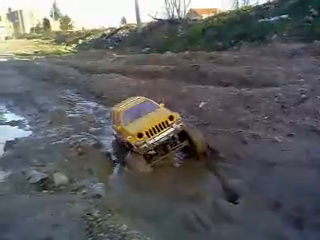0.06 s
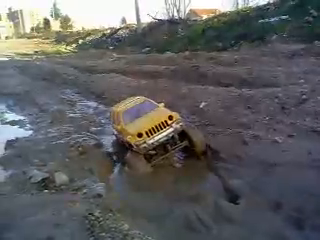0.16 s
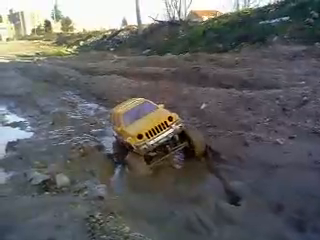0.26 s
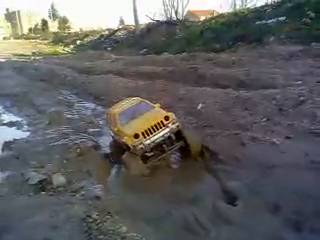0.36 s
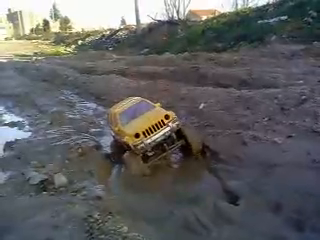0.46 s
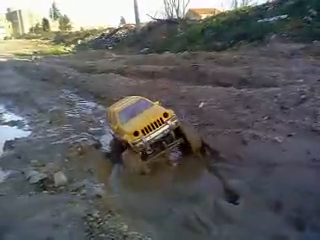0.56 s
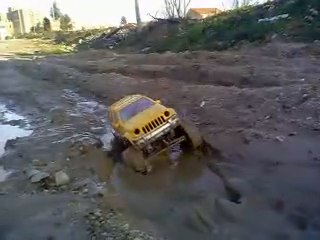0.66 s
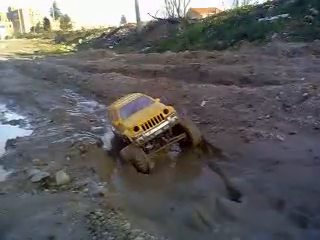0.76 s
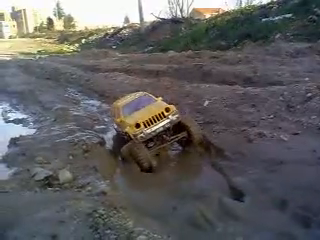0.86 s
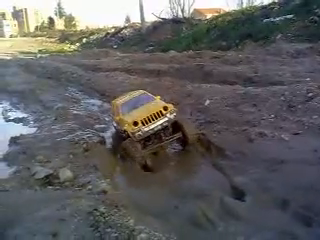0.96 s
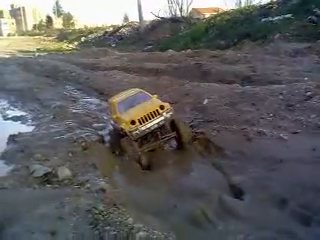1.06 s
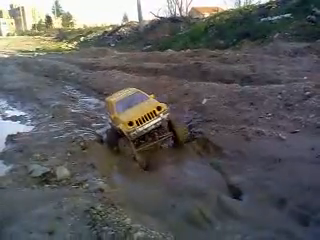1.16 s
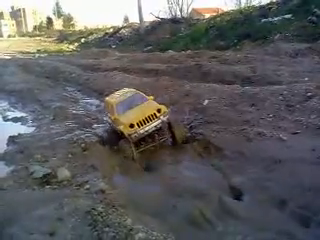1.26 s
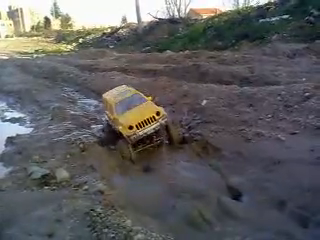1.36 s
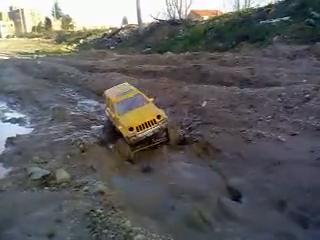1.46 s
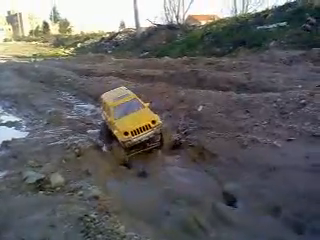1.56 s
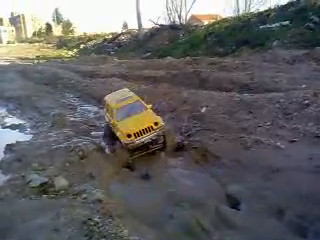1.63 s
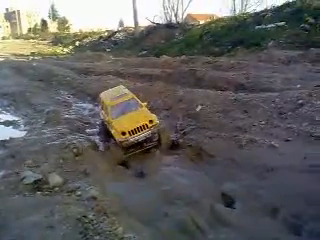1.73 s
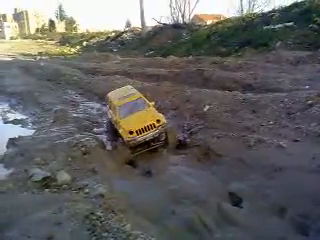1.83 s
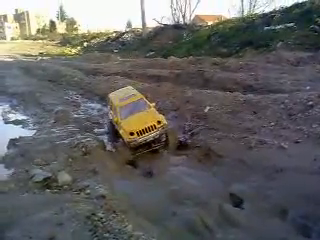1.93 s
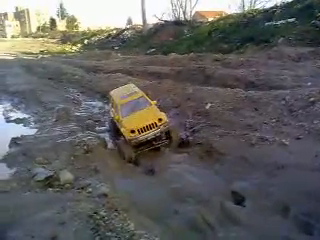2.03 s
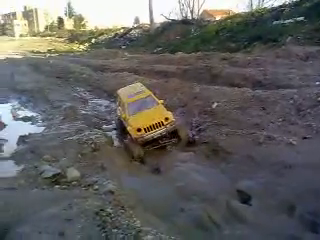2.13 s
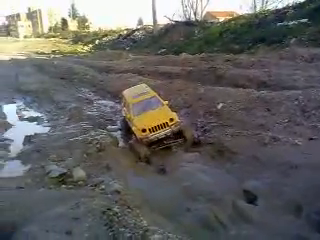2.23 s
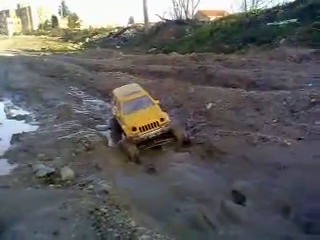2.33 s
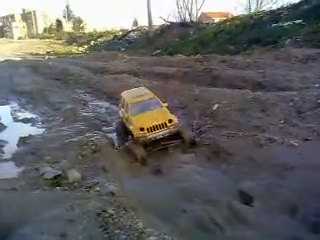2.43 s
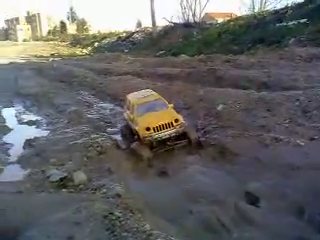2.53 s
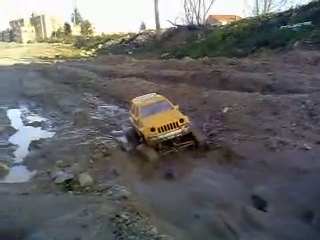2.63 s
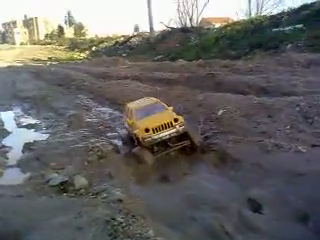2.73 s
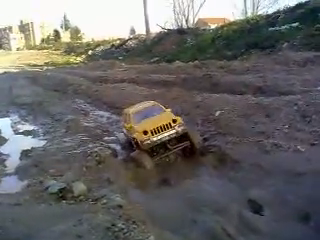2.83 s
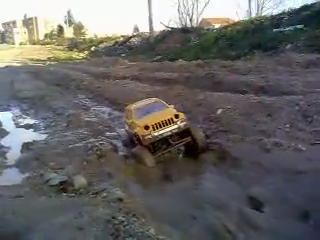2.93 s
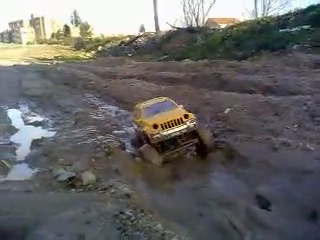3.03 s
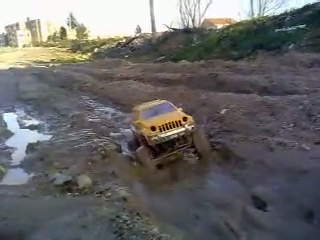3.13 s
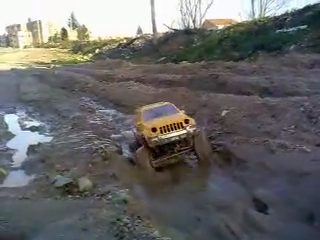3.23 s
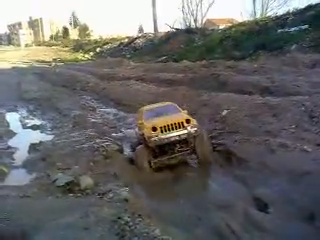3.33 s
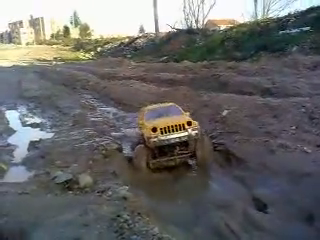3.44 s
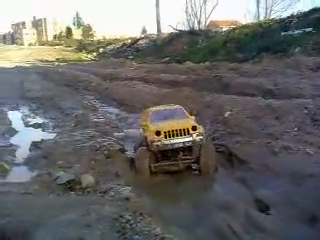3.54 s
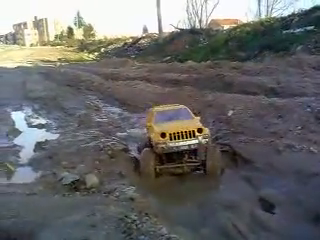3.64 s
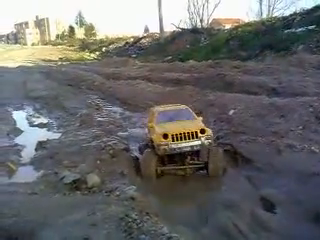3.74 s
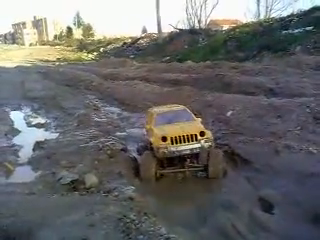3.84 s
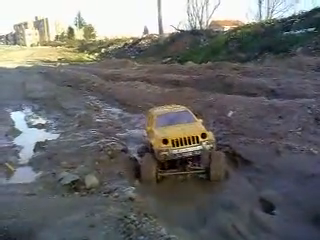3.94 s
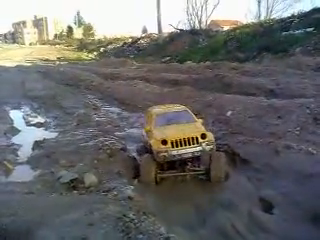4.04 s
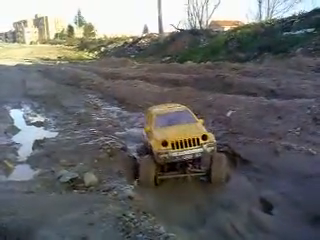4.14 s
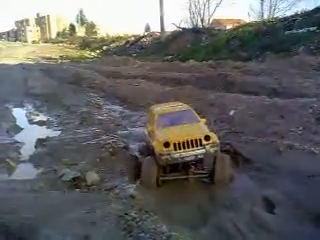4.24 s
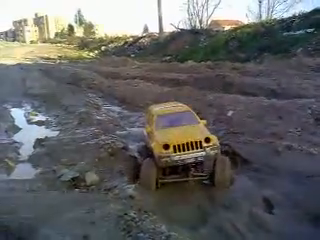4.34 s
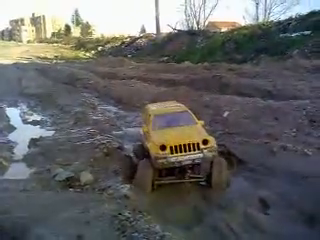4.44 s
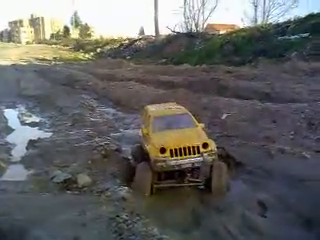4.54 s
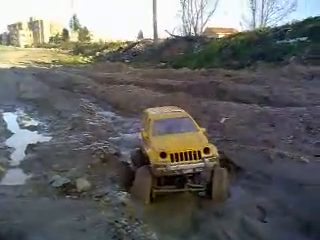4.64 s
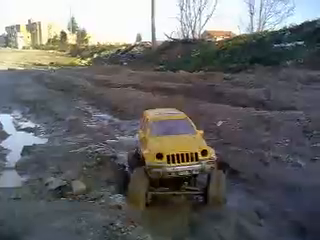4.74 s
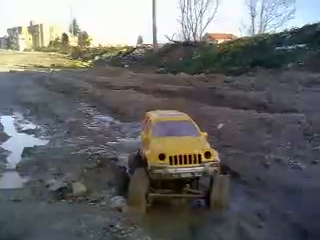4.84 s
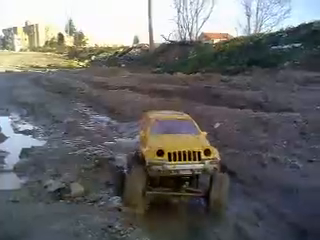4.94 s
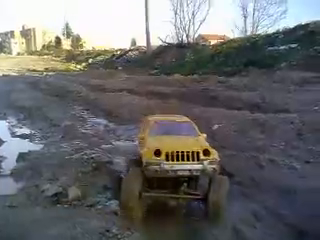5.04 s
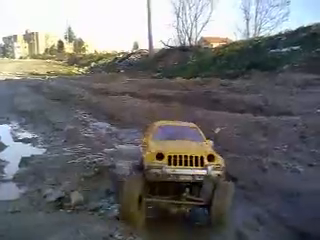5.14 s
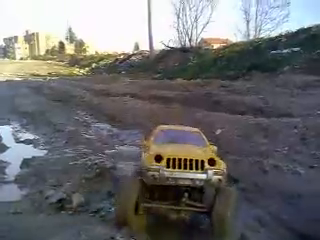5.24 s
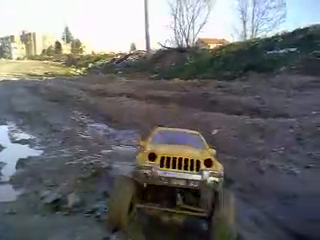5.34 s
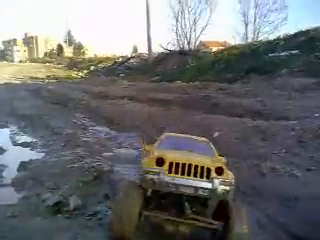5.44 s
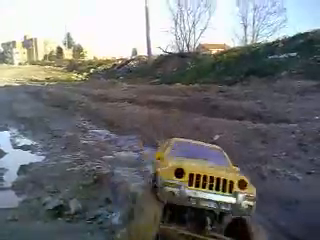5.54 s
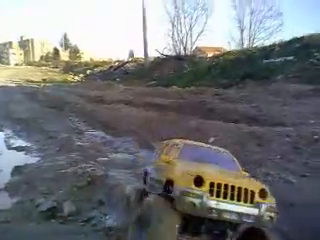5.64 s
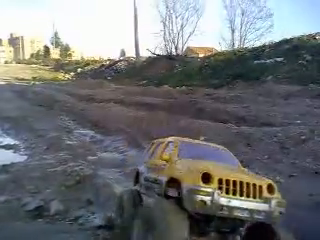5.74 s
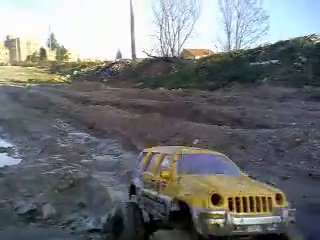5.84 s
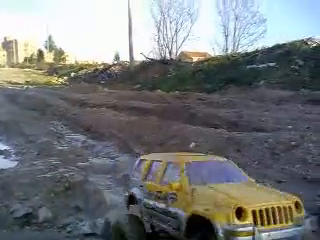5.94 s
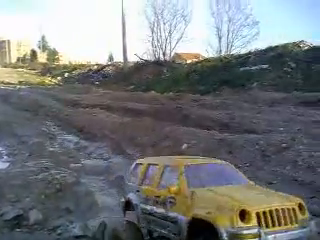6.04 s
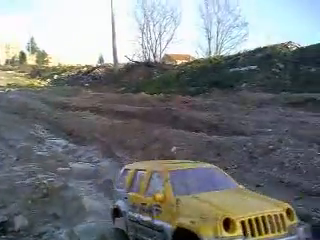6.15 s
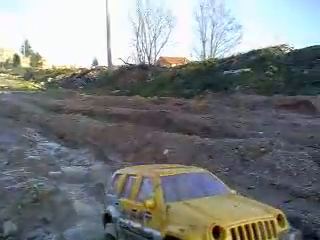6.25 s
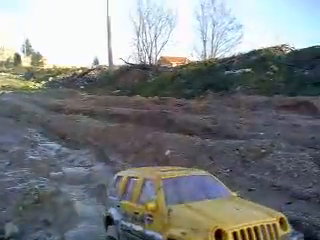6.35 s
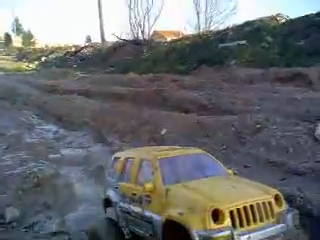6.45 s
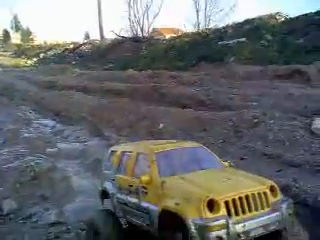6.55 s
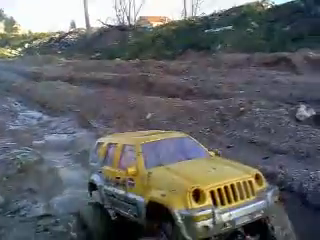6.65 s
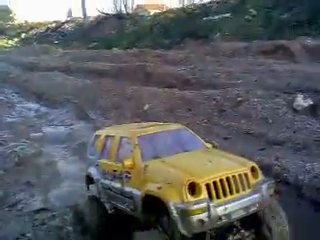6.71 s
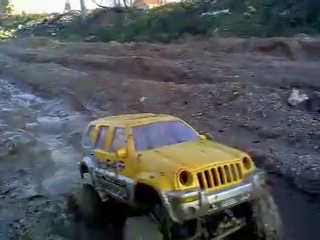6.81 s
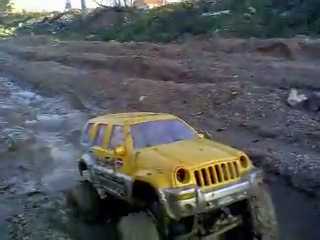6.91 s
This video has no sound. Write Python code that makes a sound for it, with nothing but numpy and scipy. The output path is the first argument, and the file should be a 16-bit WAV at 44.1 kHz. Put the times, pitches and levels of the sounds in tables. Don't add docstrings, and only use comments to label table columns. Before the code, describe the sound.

Outdoors, a small electric model truck churns in mud. Its gear whine flutters and surges with each tyre slip over a dense plastic rattle, climbs to a high whine, then cuts out briefly, leaving chirps, a soft plop and ticks. It starts again, labours and growls lower, then revs up loudly as it climbs out. Light wind and tyre rumble sit beneath; the mono microphone sounds cheap and dull on top.

```python
import sys
import numpy as np
from scipy import signal
from scipy.fft import rfft, irfft, next_fast_len
from scipy.io import wavfile
from scipy.ndimage import uniform_filter1d

SR = 44100
rng = np.random.default_rng(int(sys.argv[2]) if len(sys.argv) > 2 else 0)


def inscribe(sig):
    pcm = np.round(np.clip(np.atleast_2d(sig).T, -1, 1) * 32767)
    wavfile.write(sys.argv[1], SR, pcm.astype(np.int16))


def volts_from_decibels(level):
    exponent = np.asarray(level, float) / 20
    return 10 ** exponent


N = 307798

# time in seconds, mesh speed in Hz, mesh tone in dB, its octave in dB.
NUDGE = [
    (0.0, 633, -86, -75),
    (0.13, 878, -46, -69),
    (0.235, 1058, -39.5, -66.5),
    (0.317, 878, -46.5, -52.5),
    (0.531, 776, -47.5, -54),
    (0.615, 520, -61, -50),
    (0.76, 521, -49, -41),
    (0.86, 504, -67, -55),
    (1.096, 530, -65, -49),
]
SPIN = [
    (1.256, 713, -47, -66),
    (1.383, 948, -46, -66),
    (1.505, 1066, -43, -42),
    (1.69, 1109, -28, -46),
    (1.775, 1206, -33.5, -45),
    (2.295, 1230, -36.5, -75),
    (2.385, 788, -82, -86),
    (2.55, 900, -65, -91),
    (2.642, 829, -50.5, -52),
]
WADE = [
    (2.771, 828, -51, -34.5),
    (2.91, 755.7, -78, -38),
    (3.183, 765, -70.5, -36.5),
    (3.323, 950, -68, -35.5),
    (3.43, 939.4, -63, -36.5),
    (3.554, 741.3, -43, -30.5),
    (3.962, 851, -42.5, -29),
    (4.073, 750.6, -49, -36),
    (4.262, 622.6, -40, -44.5),
]
CLIMB = [(4.47, 590.6, -42, -43.5), (4.67, 475, -48.5, -56), (4.9, 478.4, -48, -55),
         (5.13, 596.6, -34, -36.5), (5.245, 608.4, -49.5, -42), (5.422, 911.4, -39, -34.5),
         (5.629, 1014, -42.5, -33), (5.732, 1234, -37, -33), (5.837, 1280, -27.5, -23.5),
         (5.921, 1209, -36.5, -29), (6.015, 1276, -32, -27.5), (6.06, 1438, -30, -28.5),
         (6.18, 1316, -29.5, -40), (6.258, 1148, -43.5, -31), (6.421, 1138, -44.5, -29.5),
         (6.547, 920, -59, -36.5), (6.791, 823.4, -50, -33), (6.98, 1060, -38.5, -39)]
DRIVE = NUDGE + SPIN + WADE + CLIMB

# centre in Hz, width in Hz, level in dB.
CHASSIS = [(480, 195, 2.5), (610, 80, 4), (800, 380, -10), (321, 580, -21.5)]
GEARBOX = [(1065, 405, -8.5), (1260, 130, -7), (1632, 280, 3), (1824, 390, -3.5), (2200, 240, -16.5)]
AXLES = [(2996, 630, -3), (3205, 65, 2.5), (3393, 190, -3.5)]
SHELL = [(2400, 710, 2.5), (2930, 560, 2), (3714, 480, 7.5), (4058, 200, 7.5), (4377, 960, 0),
         (5370, 2000, -5.5), (5430, 900, 1), (5905, 240, 9), (6390, 1900, 3.5), (6874, 900, -5)]

# offset in dB, share of rattle swing, share of brightness,
# share of nearness, swell on bites as an exponent.
PARTS = [
    (-6, 0.8, 0.15, 1.0, .11),
    (1.88, 0.87, 0.061, 0.24, 0.18),
    (2.86, 1.0, 0.8, -0.37, 0.65),
    (-2.5, 0.98, 1.52, 0.32, 0.32),
    (-9, 1, 1.35, 0.23, 0.18),
]


def evened(x):
    return x / np.sqrt(np.mean(x ** 2) + 1e-20)


def filtered(x, gain):
    n = next_fast_len(len(x), True)
    spectrum = rfft(x, n) * gain(np.fft.rfftfreq(n, 1 / SR))
    return evened(irfft(spectrum, n)[:len(x)])


def coloured(x, points):
    hz, db = np.transpose(points)
    return filtered(x, lambda f: volts_from_decibels(np.interp(np.log(f + 1), np.log(hz + 1), db, -90, -90)))


def drift(hz):
    lowpass = signal.butter(2, hz, fs=SR, output="sos")
    return evened(signal.sosfilt(lowpass, rng.standard_normal(N)))


def along(points, axis=1):
    columns = np.transpose(points)
    return np.interp(np.arange(N) / SR, columns[0], columns[axis])


def response(hz, modes):
    gains = [volts_from_decibels(db) / (1 + (2 * (hz - centre) / width) ** 2) for centre, width, db in modes]
    return np.sqrt(sum(gain ** 2 for gain in gains))


def ring(x, modes):
    return filtered(x, lambda f: response(f, modes) * f / (f + 250))


def mesh_hz():
    # turning time in seconds, mesh
    # speed reached in Hz.
    slips = [(0.186, 1277), (0.277, 1063), (0.375, 1102), (0.435, 805), (0.505, 900), (0.7, 619),
             (0.994, 604), (1.201, 808), (1.337, 1064), (1.465, 1283), (1.554, 1443), (1.646, 1351),
             (1.74, 1451), (1.828, 1545), (1.913, 1592), (1.996, 1541), (2.069, 1625), (2.15, 1595),
             (2.23, 1615), (2.606, 1113), (2.716, 965), (2.842, 929), (2.983, 881), (3.083, 713),
             (3.145, 851), (3.275, 1020), (3.392, 1159), (3.484, 1004),
             (3.634, 958), (3.767, 968), (3.903, 941), (4.021, 950), (4.368, 658), (4.56, 598),
                    (4.78, 562), (5.215, 735), (5.372, 893), (5.494, 1105), (5.585, 1125), (5.699, 1318),
                    (5.783, 1375), (5.879, 1394), (5.964, 1356), (6.118, 1516), (6.21, 1344), (6.306, 1310),
                    (6.393, 1286), (6.501, 1091), (6.607, 999), (6.727, 931), (6.876, 1076)]
    crest_s, top_hz = np.transpose(slips)
    half_gap = np.diff(np.r_[-1, crest_s, 9]) / 2
    spin_up_s = np.minimum(half_gap[:-1], 0.09 * 900 / top_hz)
    regrip_s = np.minimum(half_gap[1:], 0.065 * 900 / top_hz)
    grip = uniform_filter1d(along(DRIVE), size=900)
    speed, t = grip.copy(), np.arange(N) / SR
    for at, top, rise, fall in zip(crest_s, top_hz, spin_up_s, regrip_s):
        i = slice(round((at - rise) * SR), round((at + fall) * SR))
        u = (t[i] - at) / np.where(t[i] < at, rise, fall)
        speed[i] += (top - grip[round(at * SR)]) * np.cos(np.pi * u / 2) ** 2
    return speed


def shaking():
    # time in seconds, rattle in dB, brightness in dB.
    early_rattle = [(0.0, -72.5, 17.5), (0.07, -55.5, 6.5), (0.13, -45.5, 3.5), (0.19, -38, 4),
                    (0.31, -42, 1), (0.39, -35, 0), (0.64, -40, -7.5), (0.83, -55.5, 0), (1.01, -39, -3.5),
                    (1.13, -48.5, -3.5), (1.2, -32.5, -2.5), (1.26, -37, -1.5), (1.51, -39.5, 2.5),
                    (1.57, -34, 1.5), (2.27, -34, 2), (2.37, -55.5, 9.5), (2.49, -61.5, 6)]
    late_rattle = [(2.56, -50, 1.5), (2.61, -41, 1.5), (2.7, -37.5, -4), (3.1, -36.5, -3.5),
                   (3.38, -30.5, 0), (3.559, -33.5, -4.5), (4.0, -27.5, -7.5), (4.2, -34, -6.5),
                   (4.699, -34.5, -10), (4.97, -38.5, -9), (5.25, -37, -5), (5.451, -35, 3),
                   (5.771, -31.5, 4.5), (6.1, -33, 8), (6.57, -35, 1.5), (6.98, -32.5, 3.5)]
    # time in seconds, nearness in dB.
    nearness = [
        (0.0, 5.6),
        (2.5, 2),
        (4.0, 0),
        (5.5, 5.5),
        (6.98, 4),
    ]
    swing = along(early_rattle + late_rattle) + 38
    bright = along(early_rattle + late_rattle, axis=2)
    near = along(nearness)
    return [-38 + offset + a * swing + b * bright + c * near for offset, a, b, c, _ in PARTS]


def loads(hz):
    # centre in seconds, length
    # in seconds, # mesh tone in dB, octave in dB.
    bites = [(0.28, 0.093, -40.5, -76), (0.361, 0.069, -35, -40), (0.383, 0.05, -26.5, -73),
             (0.433, 0.07, -72, -30.5), (0.526, .05, -62, -35), (0.713, 0.087, -47, -42),
             (1.192, 0.15, -68, -42.5), (1.279, 0.069, -50, -64), (1.363, 0.052, -38.5, -81),
             (1.464, 0.12, -32.5, -49), (1.575, 0.049, -21, -65), (1.654, 0.033, -20.5, -44),
             (1.743, 0.015, -34, -32), (1.838, .052, -39, -23.5), (1.912, .07, -59, -33),
             (2.006, 0.014, -27.5, -22), (2.018, 0.088, -38, -59), (2.077, 0.02, -39, -22.5),
             (2.158, 0.048, -41, -30), (2.238, 0.011, -48, -23),
             (2.617, .033, -56, -32), (2.891, 0.013, -82, -29), (3.006, 0.076, -51, -32),
                  (3.131, 0.053, -40, -36), (3.221, 0.087, -63, -38.5), (3.62, 0.19, -54, -50),
                  (3.673, 0.014, -87, -23), (3.724, 0.019, -39, -32), (3.809, 0.049, -59, -30),
                  (3.97, 0.055, -76, -32), (4.059, 0.07, -46, -33), (4.225, .07, -48, -33.5),
                  (4.381, 0.17, -50, -37.5), (4.53, 0.13, -38, -56), (4.795, 0.29, -43, -44.5),
                  (4.999, 0.066, -45.5, -48.5), (5.243, 0.082, -57, -62), (5.705, 0.037, -33, -25),
                  (5.501, .06, -40, -34), (5.785, 0.063, -28.5, -24), (5.88, 0.24, -38.5, -46),
                  (6.062, 0.059, -67, -25), (6.1, 0.2, -35, -29), (6.318, 0.094, -33.5, -24.5),
                  (6.397, 0.064, -30.5, -66), (6.486, 0.031, -46, -29), (6.548, .085, -73, -45),
                  (6.674, 0.2, -49, -39), (6.792, 0.24, -64, -40.5)]
    tone_db, octave_db = along(DRIVE, axis=2), along(DRIVE, axis=3)
    drag = -np.gradient(np.log(hz)) * SR
    load = volts_from_decibels(np.array([tone_db + 0.5 * drag, octave_db]))
    for s, length, *db in bites:
        n = round(length * SR)
        start = round(s * SR) - n // 2
        load[:, start:][:, :n] += volts_from_decibels(np.array(db))[:, None] * np.hanning(n)
    axle_db = shaking()[2]
    upper = [volts_from_decibels((axle_db + steady_db) / 2 - 8) for steady_db in (tone_db, octave_db)]
    return np.r_[load, upper]


def whine(hz, load):
    phase = 2 * np.pi * np.cumsum(hz * (1 + 0.01246 * drift(65.7))) / SR
    pinion = 1 + 0.19 * np.cos(phase / 12)
    change = uniform_filter1d(abs(np.gradient(np.log(hz))) * SR, size=3000)
    rough = np.clip(0.06 * change, 0, 0.8)
    tones = np.zeros(N)
    for k, flutter_db, jitter in ((1, 2.0, 0.2), (2, 2.7, 0.26)):
        body = response(k * hz, CHASSIS + GEARBOX + AXLES) ** 0.45
        clean = volts_from_decibels(2.5 + flutter_db * drift(22)) * np.cos(k * phase + jitter * drift(140))
        grit = drift(170) * np.cos(k * phase) + drift(170) * np.sin(k * phase)
        tones += load[k - 1] * body * (np.sqrt(1 - rough ** 2) * clean + rough * grit)
    for k, db, modes in ((3, -7.0, AXLES + SHELL[2:4]), (4, 1.5, AXLES)):
        smeared = (1.2 + 0.45 * drift(60)) * np.cos(k * phase) + 0.45 * drift(70) * np.sin(k * phase)
        tones += volts_from_decibels(db) * load[k - 1] * response(k * hz, modes) * smeared
    return pinion * tones


def rattle(load):
    bite = load[0] + load[1]
    throb = (bite + 0.0013) / (uniform_filter1d(bite, size=6000) + 0.017)
    shared = 0.72 * drift(15) + 0.12 * drift(60)
    body = np.zeros(N)
    part_modes = (CHASSIS, GEARBOX, AXLES, SHELL[:5], SHELL[5:])
    for level, modes, part in zip(shaking(), part_modes, PARTS):
        strength = volts_from_decibels(2.1 * np.minimum(rng.exponential(1, N), 4))
        struck = rng.random(N) < 9000 / SR
        knocks = rng.standard_normal(N) * strength * struck
        body += volts_from_decibels(level - 5.5 + shared + 1.7 * drift(17)) * throb ** part[4] * ring(knocks, modes)
    return body


def rumble():
    # time in seconds, level in dB.
    roll = [(0.0, -48.5), (0.7, -49), (0.91, -56.5), (1.0, -51.5), (1.7, -46.5), (2.14, -41), (2.53, -54.5),
            (2.7, -49.5), (4.12, -42.5), (4.3, -44), (4.95, -47.5), (5.4, -42), (6.1, -41), (6.47, -48.5),
            (6.98, -40.5)]
    # frequency in Hz, level in dB.
    rumble_spectrum = [(12, -33), (20, 1), (42, -4), (57, 4.5), (75, -4.5), (120, -8), (180, -13),
                       (280, -20), (430, -39.5)]
    return volts_from_decibels(along(roll) + 1.6 * drift(6.5)) * coloured(rng.standard_normal(N), rumble_spectrum)


def open_air():
    # frequency in Hz, density in dB per Hz.
    air_spectrum = [(59, -44), (100, -23.5), (223, -14), (331, -24.5), (2270, -47.5), (2720, -17.5),
                    (3030, -42), (4810, -26), (7130, -24), (9270, -83.5), (15700, -120)]
    return volts_from_decibels(-69.5) * coloured(rng.standard_normal(N), air_spectrum)


def ticks():
    # start in seconds, peak in dB, pitch in Hz, 60 dB decay in seconds.
    tick_events = [
        (0.486, -25, 2820, 0.008),
        (0.789, -39.5, 2620, 0.01),
        (0.85, -33, 4400, 0.0024),
        (1.164, -30.5, 2400, 0.0095),
        (2.377, -26.5, 415, 0.0077),
        (2.423, -42, 1500, 0.0052),
        (2.502, -33.5, 2950, 0.0027),
        (2.539, -29, 1900, 0.0023),
    ]
    out, t = np.zeros(N), np.arange(1500) / SR
    for s, db, hz, t60 in tick_events:
        out[round(s * SR):][:len(t)] += volts_from_decibels(db - 60 * t / t60) * np.sin(2 * np.pi * hz * t)
    return out


def squeaks():
    # start in seconds, length in seconds, top pitch in Hz, fall in Hz, level in dB.
    squeak_events = [
        (1.2, .085, 6350, 1200, -43),
        (3.335, .107, 7000, 1700, -39),
        (2.338, .03, 5000, 700, -48),
        (2.362, .035, 4750, 500, -48),
    ]
    crest = 0.48
    out = np.zeros(N)
    for s, length, top_hz, fall_hz, db in squeak_events:
        u = np.linspace(0, 1, round(length * SR))
        glide = top_hz - fall_hz * ((u - crest) / (1 - crest)) ** 2
        whistle = np.sin(2 * np.pi * np.cumsum(glide) / SR)
        out[round(s * SR):][:len(u)] += volts_from_decibels(db) * np.sin(np.pi * u) * whistle
    return out * volts_from_decibels(1.1 * drift(80))


def hollow(x):
    t60, ring_db = 0.09, -10.0
    t = np.arange(6000) / SR
    tail = rng.standard_normal(len(t)) * volts_from_decibels(-60 * t / t60)
    return x + volts_from_decibels(ring_db) * signal.oaconvolve(x, tail / np.linalg.norm(tail))[:N]


def scene():
    hz = mesh_hz()
    load = loads(hz)
    truck = hollow(whine(hz, load) + squeaks()) + rattle(load) + ticks()
    return (truck + rumble() + open_air())[None]


def top_cut(x):
    return signal.sosfilt(signal.butter(12, 9200, fs=SR, output="sos"), x)


def record(dry):
    band_limit = signal.firwin(401, 7297, window=("kaiser", 10), fs=SR)
    x = signal.oaconvolve(dry, band_limit[None], "same")
    mirror = x * np.cos(2 * np.pi * 16000 * np.arange(N) / SR)
    slot = signal.firwin(401, [8620, 9150], window=("kaiser", 10), pass_zero=False, fs=SR)
    mix = x + volts_from_decibels(-26) * signal.oaconvolve(mirror, slot[None], "same")
    return top_cut(mix)


dry = scene()
out = record(dry)
inscribe(out)
```